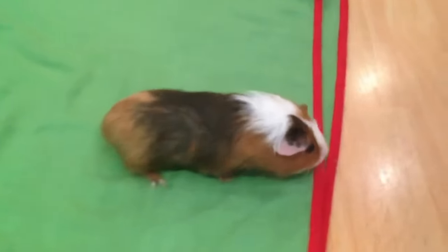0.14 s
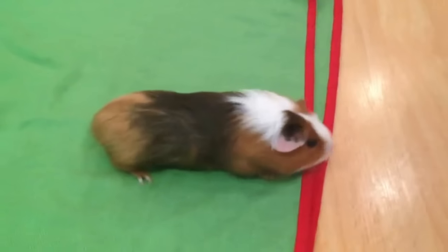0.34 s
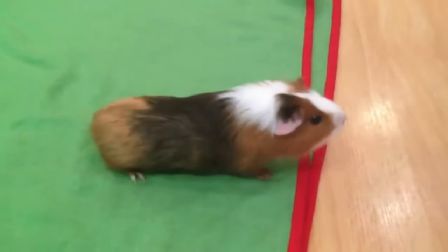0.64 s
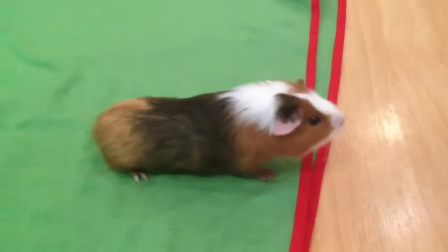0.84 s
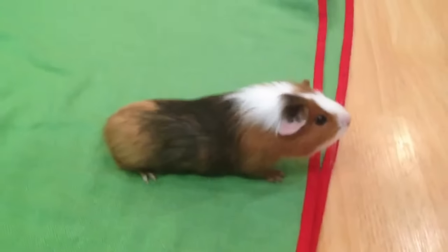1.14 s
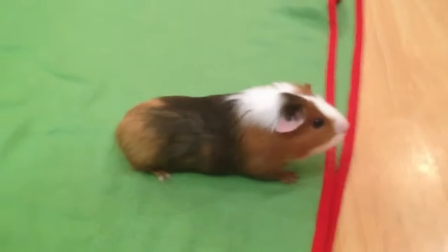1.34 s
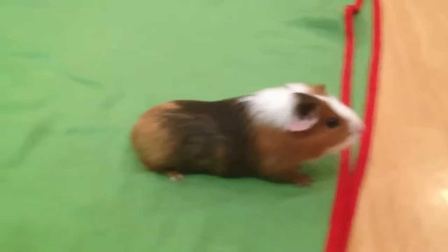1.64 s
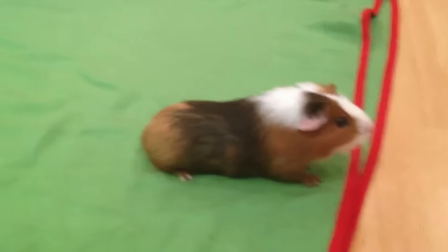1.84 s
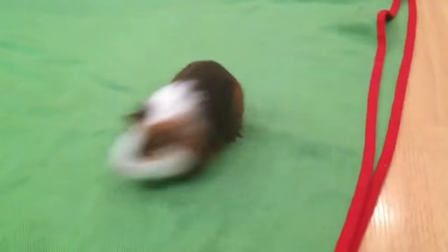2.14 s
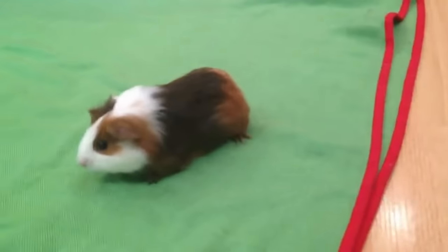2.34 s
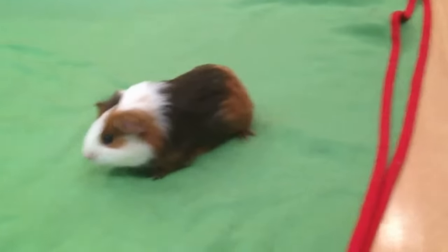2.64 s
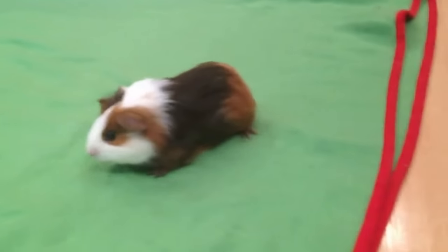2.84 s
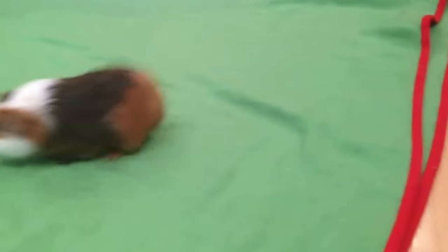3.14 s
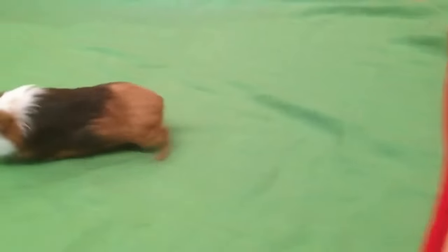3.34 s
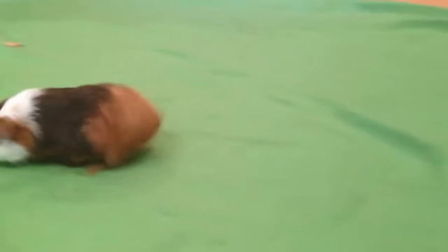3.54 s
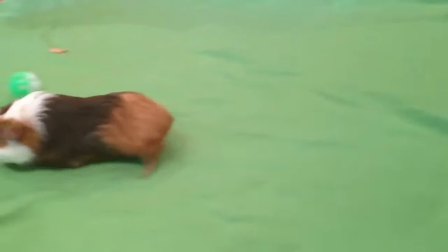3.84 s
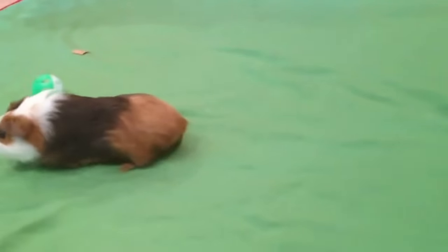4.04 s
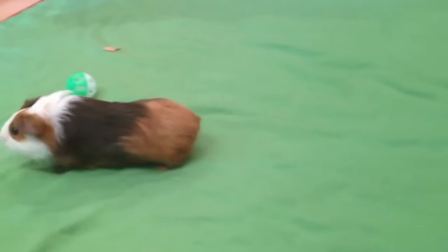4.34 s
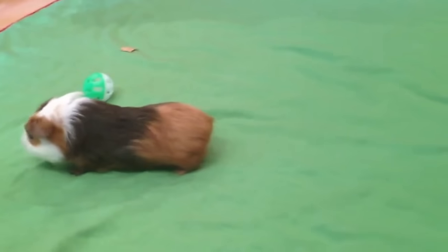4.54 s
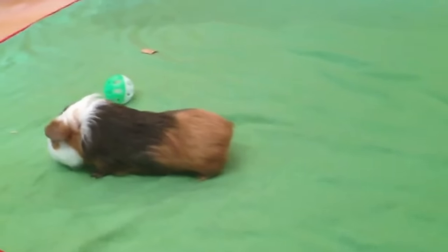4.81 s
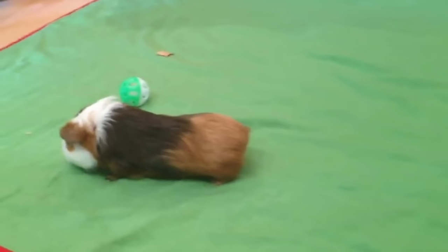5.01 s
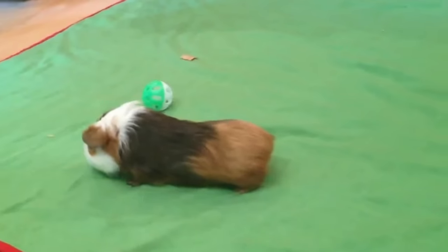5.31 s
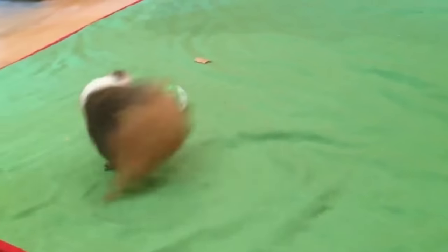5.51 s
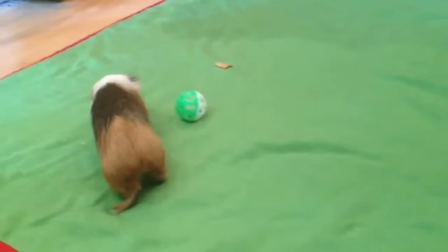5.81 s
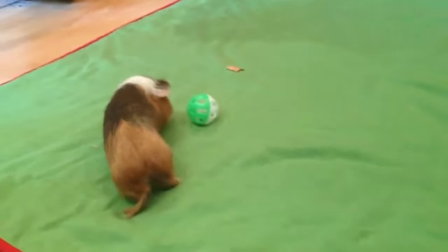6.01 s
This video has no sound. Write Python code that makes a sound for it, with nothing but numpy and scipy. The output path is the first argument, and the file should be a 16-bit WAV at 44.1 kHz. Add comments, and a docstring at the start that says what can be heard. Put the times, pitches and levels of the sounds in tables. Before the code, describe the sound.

Soft rising guinea pig squeaks, padded footsteps and claw ticks in a small room, interrupted by one second of loud, bright fabric rustling.

```python
"""A guinea pig potters about on a cloth on a wooden floor in a small room: feet pat, claws tick, short soft
rising squeaks of ringing partials with rasp. From 1.3 s cloth rustles loudly close by for a second, as
shaped noise over a low drag, and the animal darts off on louder pats. From 3.1 s squeaks return with two
thin sine peeps; at 5.5 s a squeal leaps to a higher register, then one last squeak. Throughout: random light
steps, scuffs, shuffling, hum and hiss, heard in mono."""
import sys
import numpy as np
from scipy import signal
from scipy.fft import rfft, irfft, next_fast_len
from scipy.io import wavfile
from scipy.ndimage import map_coordinates

SR = 44100
rng = np.random.default_rng(int(sys.argv[2]) if len(sys.argv) > 2 else 0)


def store_wav(level_fs):
    """Save 16-bit WAV to argv[1]."""
    pcm = np.round(np.clip(np.atleast_2d(level_fs), -1, 1) * 32767)
    wavfile.write(sys.argv[1], SR, pcm.T.astype(np.int16))


N = 272097


def amp(db):
    """Decibels to gain."""
    return 10 ** (np.asarray(db) / 20)


def unit(x):
    """Scale to rms 1."""
    return x / np.sqrt(np.mean(x ** 2) + 1e-20)


def along(points, hz):
    """Read (f/Hz, value) points on a log frequency axis."""
    f, v = np.transpose(points)
    return np.interp(np.log(hz + 1), np.log(f + 1), v)


def curves(rows, t):
    """Each column after the time, interpolated at times t."""
    s, *columns = np.transpose(rows)
    return [np.interp(t, s, column) for column in columns]


def wobble(knots_per_s, size):
    """Smooth random curve through normally distributed knots."""
    knots = rng.standard_normal(size // 8)
    return map_coordinates(knots, [np.arange(size) * knots_per_s / SR], mode="wrap")


def filtered(x, response):
    """Multiply the spectrum of x by a response of frequency."""
    m = next_fast_len(N + SR // 2)
    hz = np.fft.rfftfreq(m, 1 / SR)
    return irfft(rfft(x, m) * response(hz), m)[:N]


def noise(spectrum):
    """Coloured noise of rms 1."""
    return unit(filtered(rng.standard_normal(N), lambda hz: amp(along(spectrum, hz))))


def add(track, s, sound):
    """Mix a sound into the track from time s on."""
    part = track[max(0, round(s * SR)):][:len(sound)]
    part += sound[:len(part)]


# pitch: opening drop, climb, closing flick, waver
DROP_S, CLIMB_POWER, FLICK_S, WAVER_SHARE = 0.0108, .62, 0.0114, 0.014
# mouth opens and shuts once: softer, duller edges
SWELL_DB, SWELL_SHARE, FADE_DB, SHUT_TILT_DB = 7, 0.085, 2.5, 3.5
# rasp: floor, decay after the start, rise to the end
CLEAR_RASP, CLEARING_S, ROUGHENING_S = 0.024, 0.068, 0.01


def squeak_shape(t, length, drop_hz, low_hz, high_hz, flick_hz, db, tilt_db, first_rasp, last_rasp):
    """Pitch falls in, climbs and flicks up; the mouth and folds shape level, overtone tilt and rasp."""
    u = np.clip(t / length, 0, 1)
    left = np.maximum(length - t, 0)
    climb_hz = low_hz + (high_hz - low_hz) * u ** CLIMB_POWER
    hz = climb_hz + drop_hz * np.exp(-t / DROP_S) + flick_hz * np.exp(-left / FLICK_S)
    hz = hz * (1 + WAVER_SHARE * wobble(48.3, len(t)))
    level_db = db - SWELL_DB * np.exp(-u / SWELL_SHARE) - FADE_DB * u ** 2
    bright_db = tilt_db - SHUT_TILT_DB * (1 - np.sin(np.pi * u ** 1.67))
    rasp = CLEAR_RASP + first_rasp * np.exp(-t / CLEARING_S) + last_rasp * np.exp(-left / ROUGHENING_S)
    return hz, level_db, bright_db, np.clip(rasp, 0, 1)


# squeaks: t/s, length/s, opening drop/Hz, low f/Hz, high f/Hz, final flick/Hz, level/dB,
# overtone tilt/(dB/octave), start rasp/(0-1), end rasp/(0-1)
SQUEAK_CALLS = [ (0.118, 0.11, 63, 491, 589, 35, -48.5, 0.5, 0.32, 0.1),
                (0.598, 0.074, 30, 514, 527.5, 63, -49.5, -2, 0.27, 0.34),
                (3.062, .047, 108, 501, 530.5, 5, -53.5, -8, 0.37, .15),
                (3.274, 0.021, 53, 516, 509.5, 9.7, -55.5, -1, 0.3, 0.37),
                (3.43, 0.11, 26, 516, 551, 51, -49, -5, 0.76, 0.26),
                (3.685, 0.13, 2.9, 486, 581, 106, -50.5, 0, 0.43, .3),
                (3.991, 0.106, 23, 516.5, 548.3, 35, -51.5, -1, 0.63, 0.16),
                (4.498, 0.067, 29, 489.5, 508.3, 39, -53, -6.5, 0.44, 0),
                (5.757, .183, 59, 454.8, 583.5, 116, -52.5, 1.5, 0.84, 0.66), ]
# one squeal: t/s, f/Hz, level/dB, overtone tilt/(dB/octave), rasp/(0-1)
SQUEAL_CURVE = [(5.464, 492, -55, -9, 0.8), (5.479, 490.5, -58, -1, 0.43), (5.503, 680.5, -49, 1.5, 0.2),
                (5.52, 713, -48, -16, 0.46), (5.541, 653.6, -46, -3.5, 0.3),
                (5.567, 645.5, -55.5, 1.5, 0.05), (5.584, 673, -57, -3, 0.7), (5.606, 685, -45.5, -9, 0.56),
                (5.637, 673, -64, -1, 0.3)]
# vocal tract response: f/Hz, level/dB
THROAT_RESPONSE = [(450, 3), (700, 0), (1080, 1), (1350, -3.5), (1720, -5.5), (1980, -9), (2250, -14.5),
                   (2620, -13), (2900, -34), (3500, -14), (5000, -15)]


def squeaks(half_db=-6.5, air_db=-10, flutter_db=2, tremble_db=2.0, rasp_loss_db=6, rolloff_db=3.5,
            attack_s=.004, release_s=0.016):
    """Vocal folds ring cleanly; in raspy moments alternate cycles differ and air pulses through."""
    out, t = np.zeros(N), np.arange(SR // 4) / SR
    size = len(t)
    calls = [(s, length, squeak_shape(t, length, *rest)) for s, length, *rest in SQUEAK_CALLS]
    squeal_s, squeal_end_s = SQUEAL_CURVE[0][0], SQUEAL_CURVE[-1][0]
    calls.append((squeal_s, squeal_end_s - squeal_s, curves(SQUEAL_CURVE, squeal_s + t)))
    air_band = signal.butter(2, [650, 2800], "band", fs=SR, output="sos")
    for start, length, (hz, db, bright_db, rasp) in calls:
        hz = hz * (1 + (.008 + .045 * rasp) * wobble(350, size))  # rasp jitters the pitch
        phase = 2 * np.pi * np.cumsum(hz) / SR

        def partial(k):
            # soft folds: extra loss above the third partial
            strength = amp(along(THROAT_RESPONSE, k * hz) - rolloff_db * max(k - 3, 0))
            return strength * np.sin(k * phase + rng.uniform(0, 2 * np.pi))

        def overtone(k):
            # effort sets the tilt; each overtone flutters on its own
            return partial(k) * amp(bright_db * np.log2(k) + flutter_db * wobble(73.5, size))

        overtones = sum(overtone(k) for k in range(2, 8))
        halves = sum(partial(k + .5) * (1 + .5 * wobble(176, size)) for k in range(1, 6))
        air = unit(signal.sosfilt(air_band, rng.standard_normal(size)))
        harsh = amp(half_db) * halves + amp(air_db) * air * (1 + np.cos(phase))
        fundamental = partial(0.99) * amp(tremble_db * wobble(59, size))
        voice = fundamental + amp(-rasp_loss_db * rasp) * overtones + rasp * amp(bright_db / 2) * harsh
        gate = np.clip(t / attack_s, 0, 1) * np.clip(1 + (length - t) / release_s, 0, 1)
        add(out, start - attack_s / 2, np.sqrt(2) * amp(db) * gate * voice)
    return out


# thin peeps: t/s, length/s, start f/Hz, end f/Hz, level/dB
PEEP_CALLS = [(3.094, 0.042, 4970, 6400, -64), (3.321, 0.028, 5630, 6700, -64.5)]


def peeps(octave_db=-7):
    """Faint, wheezy upward whistles: a wavering sine and its octave."""
    out, t = np.zeros(N), np.arange(SR // 10) / SR
    for s, length, low_hz, high_hz, db in PEEP_CALLS:
        u = np.clip(t / length, 0, 1)
        hz = (low_hz + (high_hz - low_hz) * np.sqrt(u)) * (1 + .075 * wobble(1500, len(t)))
        phase = 2 * np.pi * np.cumsum(hz) / SR
        whistle = np.sin(phase) + amp(octave_db) * np.sin(2 * phase)
        add(out, s, amp(db) * np.sin(np.pi * u) * whistle)
    return out


STEPS_PER_S, STEP_OVER_SHUFFLE_DB, STEP_HZ = 3.9, 19.5, 230


def light_steps():
    """Light footfalls at random times, standing out above the shuffling and rising and falling with it."""
    draws = rng.uniform(size=(round(STEPS_PER_S * N / SR), 2))
    times = draws[:, 0] * N / SR
    levels_db = curves(SHUFFLE_LEVEL, times)[0] + STEP_OVER_SHUFFLE_DB
    pitches_hz = STEP_HZ * 2 ** (draws[:, 1] - .5)  # half an octave either way
    return list(zip(times, levels_db, pitches_hz))


# heavier footfalls: t/s, level/dB (before gain_db), f/Hz
FOOTFALLS = [(.031, -45.5, 192), (0.342, -47, 177), (.531, -50, 221), (0.854, -51, 216), (1.252, -46, 177),
             (1.335, -48, 324), (1.391, -45, 216), (1.476, -44, 220), (2.05, -42, 235), (2.129, -36.5, 233),
             (2.211, -36, 334), (2.354, -47.5, 200), (2.442, -42.5, 198), (2.625, -41.5, 223),
             (2.848, -46, 177), (2.952, -48, 182), (3.214, -40, 212), (3.26, -45, 254), (3.629, -53, 222),
             (3.769, -47, 243), (4.858, -48.5, 172), (5.61, -37, 328)]


def pats(thud_t60_s=0.031, thud_rise_s=0.00095, slap_db=-4, slap_t60_s=0.022, slap_rise_s=0.0013,
         slap_ratio=1.97, gain_db=1, lowest_hz=95):
    """A padded foot gives the floor a few quickly damped swings: a thud and a higher slap."""
    out, t = np.zeros(N), np.arange(SR // 8) / SR
    thud_envelope = amp(-60 * t / thud_t60_s) * (1 - np.exp(-t / thud_rise_s))
    slap_envelope = amp(slap_db - 60 * t / slap_t60_s) * (1 - np.exp(-t / slap_rise_s))
    for s, db, hz in FOOTFALLS + light_steps():
        thud = np.sin(2 * np.pi * hz * t) * thud_envelope
        slap = np.sin(2 * np.pi * slap_ratio * hz * t) * slap_envelope
        add(out, s, amp(db + gain_db) * (thud + slap))
    return signal.sosfilt(signal.butter(2, lowest_hz, "high", fs=SR, output="sos"), out)


KNOCK_HZ, KNOCK_DB = 796, -5.5  # floor under the cloth
# claw ticks and small snaps: t/s, level/dB (before gain_db), ring f/Hz, ring t60/s
CLAW_TICKS = [(.064, -40, 3600, 0.03), (0.073, -36, 3050, 0.026), (.925, -49, 4600, 0.049),
              (1.2796, -47, 3320, .0094), (1.387, -43, 780, .022), (2.4178, -50, 3970, 0.023),
              (2.419, -43, 1290, 0.018), (2.625, -37, 970, 0.0083), (2.6591, -42.5, 3430, 0.02),
              (2.858, -45.5, 2220, .015), (2.9777, -38, 4200, 0.022), (3.478, -41, 4230, 0.015),
              (3.484, -39.5, 3900, 0.012), (3.657, -39, 1890, 0.0064)]


def ticks(crack_db=-7, gain_db=-5):
    """A hard contact cracks, rings broadly and knocks the floor; duller contacts have less treble."""
    out, t = np.zeros(N), np.arange(SR // 10) / SR
    for s, db, hz, t60 in CLAW_TICKS:
        burst = rng.standard_normal(len(t))
        ring = unit(signal.lfilter(*signal.iirpeak(hz, 3, SR), burst))
        crack = unit(signal.lfilter(*signal.butter(1, 500, "high", fs=SR), burst))
        snap = unit(signal.lfilter(*signal.butter(2, 2 * hz, fs=SR), ring + amp(crack_db) * crack))
        knock = unit(signal.lfilter(*signal.iirpeak(KNOCK_HZ, 1, SR), burst))
        add(out, s, amp(db + gain_db - 60 * t / t60) * (snap + amp(KNOCK_DB) * knock))
    return out


# feet and fur on cloth: peak t/s, level/dB, rise/s, fall/s
SCUFF_SWELLS = [(.005, -53, 0.023, 0.029), (.077, -55, 0.02, 0.079), (.935, -60.5, 0.05, 0.063),
                (2.67, -59, 0.016, 0.031), (3.23, -65.5, 0.21, 0.039), (3.504, -52.5, 0.0088, 0.017),
                (6.11, -63, 0.032, .036)]
# scuff spectrum: f/Hz, relative level/dB
SCUFF_SPECTRUM = [(300, -1), (1000, 0), (2300, 3.5), (4800, 1), (7500, -4), (10000, -18.5), (14000, -12)]
# airy strokes of fur: peak t/s, level/dB
FUR_STROKES = [(.3, -76), (.94, -64.5), (1.3, -71.5), (6.12, -72)]
BRUSH_RISE_S, BRUSH_FALL_S = 0.12, 0.088


def scuffs(grain_db=2.0):
    """Brief grainy swells of friction, and a fine hiss of brushed fur."""
    t = np.arange(N) / SR

    def swell(s, db, rise_s, fall_s):
        return amp(db) * np.exp(-np.maximum((s - t) / rise_s, (t - s) / fall_s))

    scuff_level = sum(swell(*row) for row in SCUFF_SWELLS)
    fur_level = sum(swell(s, db, BRUSH_RISE_S, BRUSH_FALL_S) for s, db in FUR_STROKES)
    friction = unit(noise(SCUFF_SPECTRUM) * amp(grain_db * wobble(460, N)))
    fur = noise([(2000, -58), (7000, 4.5), (11000, -2), (15000, 3), (17000, -47)])
    return scuff_level * friction + fur_level * fur


# cloth slide, drives rub and hiss: t/s, level/dB (before gains)
SLIDE_LEVEL = [(1.3, -82), (1.345, -64), (1.44, -51), (1.555, -40), (1.61, -39.5), (1.69, -34.5),
               (1.745, -38), (2, -41.5), (2.11, -39), (2.2, -43), (2.286, -52.5), (2.4, -69.5)]
# low drag, swells early then sinks to a grumble: t/s, level/dB (before drag_gain_db)
LOW_DRAG_LEVEL = [(1.29, -73), (1.335, -64), (1.44, -60), (1.55, -39), (1.7, -42.5), (1.82, -56.5),
                  (2.2, -58), (2.29, -68)]
# rub spectrum: f/Hz, relative level/dB
RUB_SPECTRUM = [(150, -41), (400, -6), (500, -12), (750, -10.5), (1000, -11.5), (1250, -12), (1450, -8),
                (1700, -3.5), (2000, -6), (2750, -10), (3400, -6.5), (4000, -6.5), (4700, -8), (5200, -22),
                (8000, -78)]
# narrow resonances, hollow tone of the rub: f/Hz, width/Hz, boost/dB
HOLLOW_RESONANCES = [(1492, 22, 4), (1563, 18, 5), (1692, 22, 5), (1820, 18, 4), (2010, 22, 3),
                     (3295, 45, 4), (3484, 16, 4), (3606, 16, 3.5), (3870, 55, 3.5), (4021, 16, 3.5),
                     (4318, 18, 4.5)]
# cloth hiss spectrum: f/Hz, relative level/dB
CLOTH_HISS_SPECTRUM = [(2940, -31), (5000, 7), (5170, 1.5), (5670, 6.5), (7580, 4.5), (9580, -4),
                       (11400, -2.5), (14400, -9), (15300, -16)]
# drag spectrum: f/Hz, relative level/dB
DRAG_SPECTRUM = [(50, -70), (110, -31.5), (160, -9.5), (215, -11.5), (242, -4.5), (263, 1), (278, -5),
                 (294, 3), (335, -18), (450, -12.5), (700, -26), (1500, -120)]


def rustle(grain_db=1, lump_db=1, drag_gain_db=-1.0, rub_gain_db=0, hiss_gain_db=-4.5,
           brighten_db_per_s=1.0):
    """Cloth slides close by: countless fibres catch, ever brighter, over a lumpy low drag."""
    t = np.arange(N) / SR
    (slide_db,), (drag_db,) = curves(SLIDE_LEVEL, t), curves(LOW_DRAG_LEVEL, t)
    gate = np.interp(t, [1.27, 1.33, 2.36, 2.43], [0, 1, 1, 0])
    fibres = unit(amp(grain_db * wobble(600, N)))

    def hollow(hz):
        boosts = (db / (1 + (2 * (hz - centre) / width) ** 2) for centre, width, db in HOLLOW_RESONANCES)
        return amp(sum(boosts))

    rub = amp(slide_db + rub_gain_db) * unit(filtered(noise(RUB_SPECTRUM), hollow))
    mean_slide_s = np.mean(SLIDE_LEVEL, axis=0)[0]
    hiss_db = slide_db + hiss_gain_db + brighten_db_per_s * (t - mean_slide_s)
    hiss = amp(hiss_db) * noise(CLOTH_HISS_SPECTRUM)
    drag = amp(drag_db + drag_gain_db) * unit(noise(DRAG_SPECTRUM) * amp(lump_db * wobble(44.2, N)))
    return gate * (fibres * (rub + hiss) + drag)


# shuffling, also sets the light steps: t/s, level/dB
SHUFFLE_LEVEL = [(0, -67.5), (1, -68), (2.7, -72), (3.6, -69), (4.3, -77), (5.2, -75.5), (5.6, -71),
                 (6.1, -76)]
# room hum: t/s, level/dB
HUM_LEVEL = [(1, -86), (2.8, -79.5), (4.3, -88), (5.6, -87), (6.1, -79.5)]
# steady hiss spectrum: f/Hz, relative level/dB
HISS_SPECTRUM = [(18, -70), (30, -36), (59, -55), (81, -22), (186, -1.5), (242, -9), (268, -3.5),
                 (543, -12.5), (824, -16), (1130, -15.5), (2280, -18.5), (7000, -19), (9820, -26),
                 (14100, -20), (15300, -22.5)]


def background(hiss_db=-68.0, hum_hz=93):
    """Steady hiss, a weak hum and low, uneven shuffling that calms when the animal rests."""
    t = np.arange(N) / SR
    (hum_db,), (shuffle_db,) = curves(HUM_LEVEL, t), curves(SHUFFLE_LEVEL, t)
    hum = np.sqrt(2) * np.sin(2 * np.pi * hum_hz * t + 0.44 * wobble(4, N))
    lumps = amp(3.5 * wobble(45, N))
    low_noise = noise([(60, -47), (130, -4.5), (220, -5.5), (450, -17.0), (1200, -17.5),
                       (5000, -20.5), (14000, -30.5)])
    shuffle = unit(low_noise * lumps)
    return amp(hiss_db) * noise(HISS_SPECTRUM) + amp(hum_db) * hum + amp(shuffle_db) * shuffle


# room decay: f/Hz, t60/s
ROOM_T60 = [(200, 0.22), (600, 0.39), (2000, 0.4), (6000, 0.12), (14000, 0.031)]


def room(x, delay_s=.006):
    """The walls answer with a short noise tail that dies faster in the treble."""
    hz, t, z = signal.stft(rng.standard_normal(SR // 2), SR, nperseg=256)
    decay = amp(-60 * t / along(ROOM_T60, hz)[:, None])
    tail = signal.istft(z * decay, SR, nperseg=256)[1]
    delayed = np.pad(x, (int(delay_s * SR), 0))
    return signal.fftconvolve(delayed, tail / np.linalg.norm(tail))[:N]


def scene(voice_room_db=-11, tick_room_db=-10, pat_room_db=-16, peep_room_db=0):
    """Sum the animal, its room echo, the close cloth and the background, in mono."""
    voice, whistles, feet, claws = squeaks(), peeps(), pats(), ticks() + scuffs()
    sent = amp(voice_room_db) * voice + amp(tick_room_db) * claws
    sent = sent + amp(pat_room_db) * feet + amp(peep_room_db) * whistles
    mono = voice + whistles + feet + claws + room(sent) + rustle() + background()
    return np.array([mono, mono])


def record(dry, bass_hz=60, top_hz=15400):
    """The microphone sheds deep bass and keeps nothing above its band limit."""
    thin = signal.sosfilt(signal.butter(1, bass_hz, "high", fs=SR, output="sos"), dry)
    return np.array([filtered(channel, lambda hz: hz < top_hz) for channel in thin])


dry = scene()
out = record(dry)
store_wav(out)
```